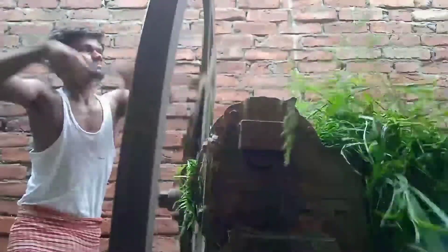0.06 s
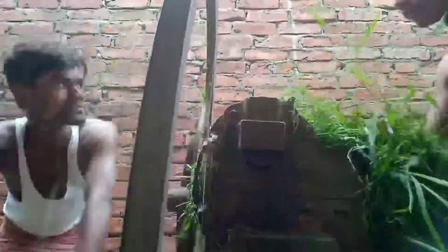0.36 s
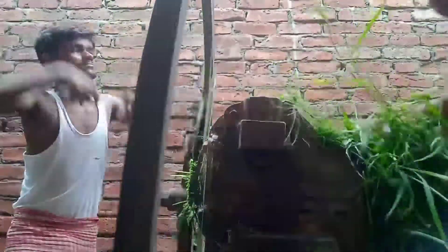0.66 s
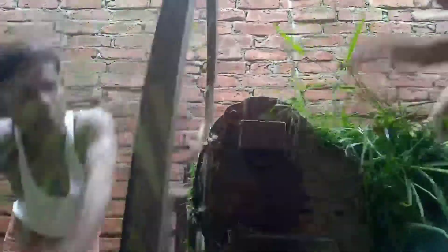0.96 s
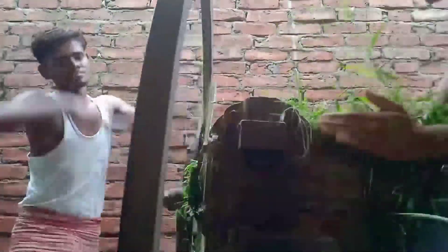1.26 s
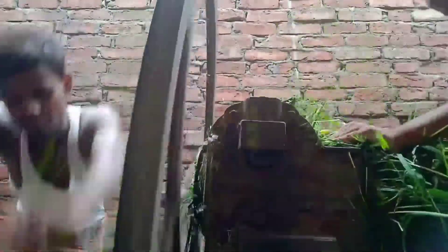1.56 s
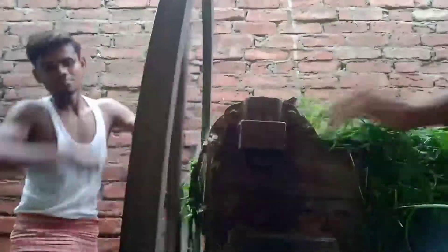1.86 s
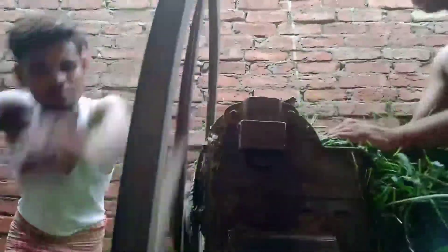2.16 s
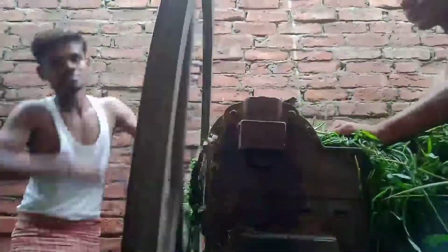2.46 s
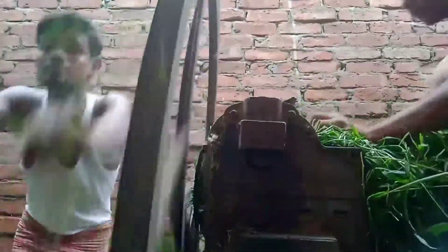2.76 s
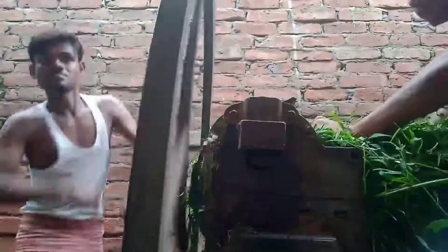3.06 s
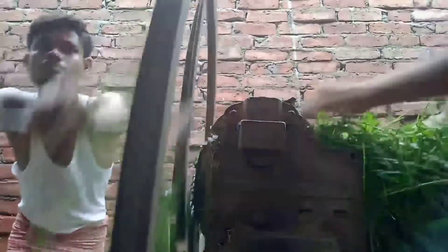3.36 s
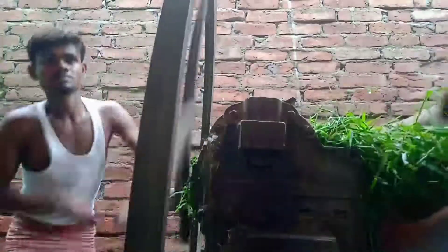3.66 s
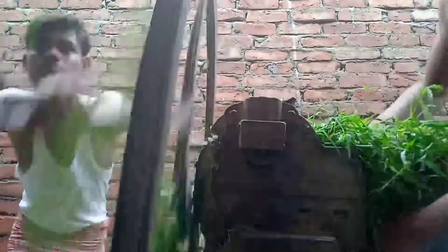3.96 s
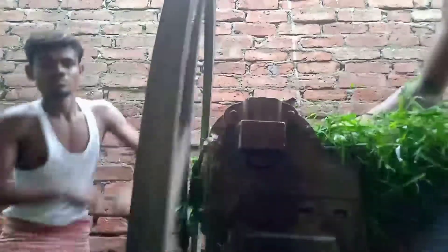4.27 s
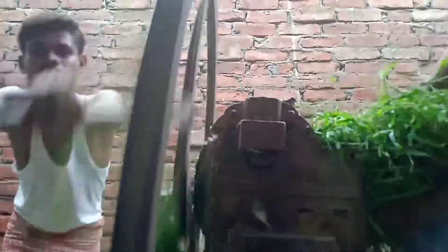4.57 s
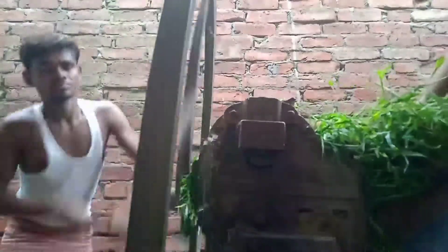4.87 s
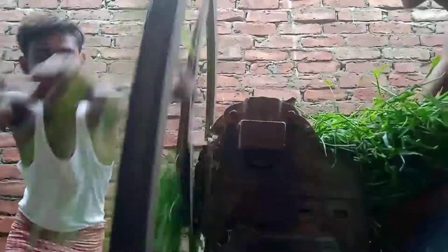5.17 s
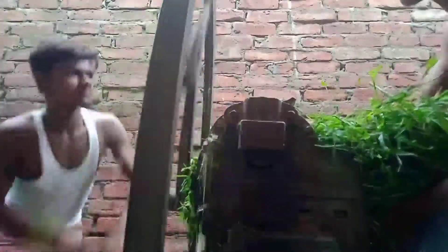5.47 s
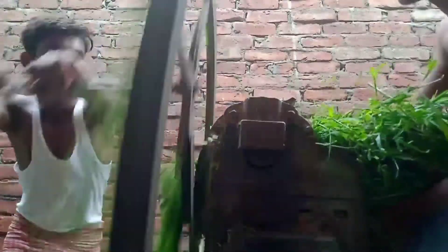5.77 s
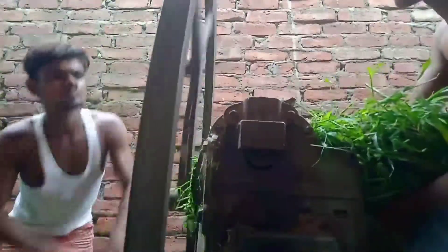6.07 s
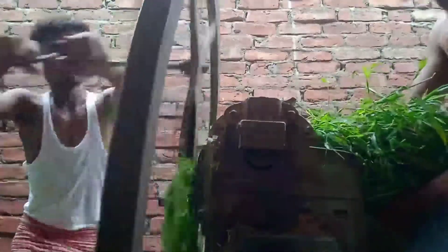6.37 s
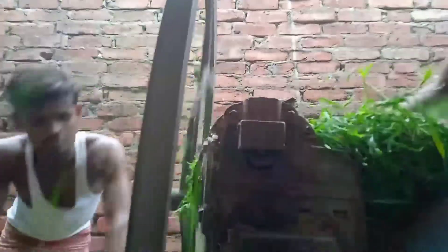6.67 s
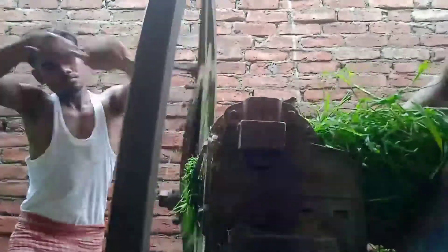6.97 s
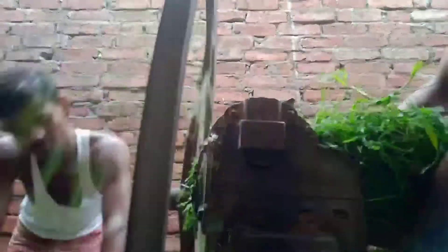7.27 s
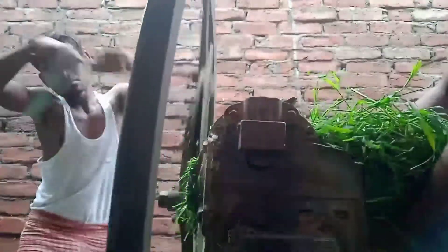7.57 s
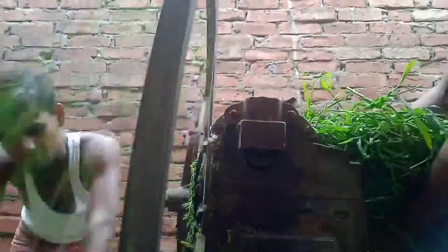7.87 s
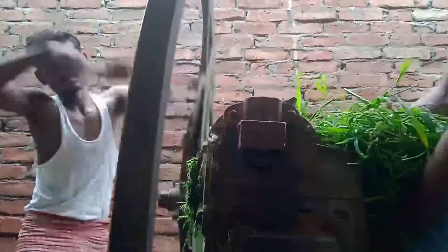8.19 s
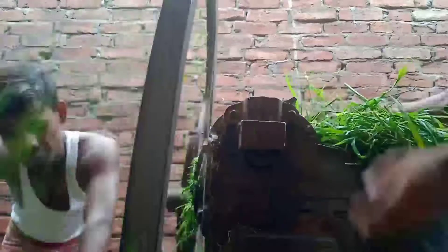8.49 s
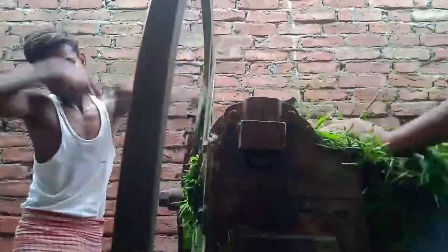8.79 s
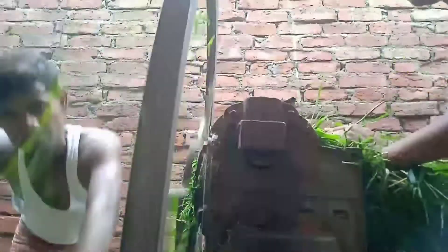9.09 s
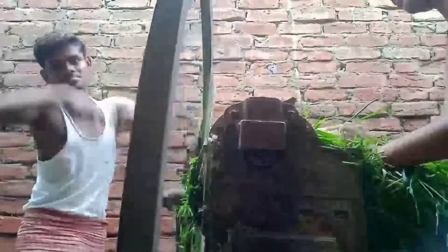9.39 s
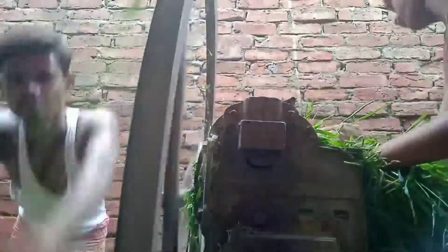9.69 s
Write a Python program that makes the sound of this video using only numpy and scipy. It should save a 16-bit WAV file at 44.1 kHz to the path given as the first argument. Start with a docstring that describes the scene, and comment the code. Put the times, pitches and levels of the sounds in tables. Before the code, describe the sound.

Rhythmic crunching chops of grass and short blade scrapes alternate with the clacking, grinding gears of a hand-turned chaff cutter.

```python
"""A hand-cranked chaff cutter chops green grass in front of a brick wall, with a phone close by.
First a blade crunches through the bundle, snapping stalks and tearing leaves, then scrapes off the
iron mouth. After the cut the loose feed gears knock, grind and sing while more grass rustles in;
now and then chopped clumps drop or a dry bearing chirps. Last, the crank clunks as it takes up its
slack, and the next blade bites. This repeats about every 0.62 s, 16 cuts in all, in a quiet yard."""
import sys
import numpy as np
from scipy import signal
from scipy.fft import rfft, irfft
from scipy.io import wavfile
from scipy.ndimage import uniform_filter1d, minimum_filter1d

SR = 44100
rng = np.random.default_rng(int(sys.argv[2]) if len(sys.argv) > 2 else 0)


def generate_wav(signal):
    """Clip the signal to [-1, 1] and save it as 16-bit WAV at the path in sys.argv[1]."""
    frames = np.transpose(np.atleast_2d(signal))
    scaled = np.clip(frames, -1, 1) * 32767
    pcm = np.round(scaled).astype(np.int16)
    wavfile.write(sys.argv[1], SR, pcm)


N = 438350
T = np.arange(N) / SR

# Table levels are relative: each layer gets its own gain. A "t60" is the time to fade by 60 dB.
# One row per blade pass: (time [s], length [s], stalk crunch [dB], crunch growth during the cut [dB],
# leaf tearing [dB], scrape [dB], grass rustle afterwards [dB], gear singing afterwards [dB])
CUTS = [(0.006, 0.11, -10.5, -1, -18.5, -7.5, -34, -43), (0.637, 0.11, -9, 5, -19, -4.5, -40, -31),
        (1.274, .118, -11.5, 4, -20.5, -7.5, -36, -36), (1.895, 0.11, -11, 2, -19, -8.5, -42, -39),
        (2.516, 0.11, -11, -0.5, -19.5, -12, -38.5, -27), (3.118, 0.13, -13, 0, -20, -10, -37.5, -32),
        (3.732, 0.12, -10.5, 0, -21, -10, -40, -51), (4.343, 0.12, -9.5, -1, -20, -12, -40, -48),
        (4.956, 0.13, -12.5, -4.5, -20.5, -13, -39, -36), (5.590, 0.13, -12, 1, -20.5, -13.5, -36.5, -48),
        (6.249, 0.12, -10.5, 0, -20.5, -9.5, -37.5, -46), (6.873, 0.13, -11.5, -5.5, -21, -34, -37, -49),
        (7.504, .117, -10, -3.5, -19.5, -18, -35, -52), (8.125, 0.12, -9.5, -1, -19.5, -17, -37.5, -49),
        (8.774, 0.1, -10.5, -1.5, -18, -12, -36, -50), (9.408, 0.1, -9, -4.5, -18, -15, -39, -54)]
# The notes at which the cast-iron frame and gears ring: (pitch [Hz], t60 [s], level [dB])
IRON_NOTES = [(611, 0.21, -11), (685, 0.13, 0), (747, 0.11, -3), (823.5, 0.11, 4.5), (957, 0.011, 7.5),
              (979, 0.21, -2.5), (1097, 0.015, 2.5), (1222, 0.093, 6.5), (1261, 0.21, -4),
              (1475, 0.12, 6.5), (1694, 0.019, 6), (1736, 0.21, 2), (1775, 0.18, -1), (1994, 0.082, 5),
              (2295, 0.13, -7), (2660, 0.12, -8), (2700, 0.14, -13), (3250, 0.1, -5.5), (3405, 0.035, -2),
              (3470, 0.021, 0.5), (4370, 0.066, -12.5), (4900, 0.071, -18), (5520, 0.052, -13),
              (5900, 0.047, -13), (6620, 0.043, -8.5)]
# The bright tone of tearing or rustling leaves: (frequency [Hz], level [dB])
LEAF_SPECTRUM = [(100, -20), (280, -5), (700, 5.5), (1600, 8.5), (2600, 7.5), (3100, 2), (4500, -1),
                 (6000, 0.5), (7400, 0), (8500, -7), (11000, -15), (13500, -30.5), (16000, -25)]
# The dull tone of the rattling crank and grinding teeth: (frequency [Hz], level [dB])
RATTLE_SPECTRUM = [(50, -29), (120, -14), (300, -9), (600, -6), (800, 6.5), (1050, -10.5), (1600, -4),
                   (2400, -7.5), (3200, -21), (7000, -26), (10000, -37), (16000, -68)]


def chopping():
    """The blade bites: stalks snap in clusters and shake the iron, while leaves tear in a fine crackle."""
    # The blade hits a tight bundle or a thick stalk: (time [s], level [dB])
    bites = [(1.274, -15.5), (1.889, -11.5), (3.117, -13), (3.234, 0), (4.349, -14), (5.574, -11.5),
             (6.87, -21), (7.498, -11), (8.781, -17)]
    # The tone of snapping stalks: (frequency [Hz], level [dB])
    stalk_spectrum = [(30, -38), (55, -31), (100, -18), (170, -17), (220, -12), (310, -4.5), (420, -3.5),
                      (600, 1), (900, -1), (1250, -6), (1650, -6), (2500, -14), (3200, -25), (8000, -45)]
    start, _, crunch_db, growth_db, leaf_db = np.transpose(CUTS)[:5]
    in_bundle = start + 0.019, cut_ends() - 0.019  # from when to when the blade is fully in the grass
    crunch = swells(*in_bundle, crunch_db, attack_s=0.031, release_s=0.052, growth_db=growth_db)
    tear = swells(*in_bundle, leaf_db, attack_s=0.037, release_s=0.033, growth_db=3)
    times, db = np.transpose(bites)
    bite = bursts(times, db, hold_s=0.0052, rise_s=0.00095, t60=0.034) * clicks(rate=4500, spread_db=1)
    snaps = bite + crunch * clicks(rate=1200, spread_db=2.5) * undb(wander(130))
    pops = hollow_stems(crunch * clicks(rate=200, spread_db=2.5))
    fibres = tear * clicks(rate=7000, spread_db=2) * undb(1.6 * wander(200))
    stalks = undb(-2.5) * colour(snaps, stalk_spectrum)
    return stalks + pops + undb(-17.5) * iron(snaps) + undb(1) * colour(fibres, LEAF_SPECTRUM)


def hollow_stems(pops, pitch_hz=643, width_hz=69):
    """Hollow stems ring briefly as they burst, at a pitch that slides about as they are crushed."""
    # The thickest stems burst with a loud note: (time [s], level [dB])
    thick_stems = [(.035, -3), (0.685, -6), (.715, -9), (2.539, -7), (2.583, -4), (3.151, -8), (3.201, -3),
                   (4.359, -2), (4.385, -5), (4.409, -2), (4.99, -10), (6.91, -7.5), (8.848, -5),
                   (9.45, -2)]
    sliding_hz = pitch_hz * np.exp(0.11 * wander(45))
    tone = np.exp(2j * np.pi * np.cumsum(sliding_hz) / SR)
    decay = np.exp(-np.pi * width_hz / SR)
    # Divide by the tone, smooth, multiply back: each pop now rings at the sliding pitch.
    thin = tone * signal.lfilter([np.sqrt(2 * (1 - decay ** 2))], [1, -decay], pops / tone)
    times, db = np.transpose(thick_stems)
    thick = tone * bursts(times, db, hold_s=0.009, rise_s=0.0031, t60=0.072)
    return (undb(-8) * thin + undb(-4) * thick).imag


def scraping(lead_s=0.04):
    """Just before each cut ends, the blade's edge rubs briefly along the iron mouth."""
    # The tone of the rubbing edge: (frequency [Hz], level [dB])
    edge_spectrum = [(40, -7), (100, -46), (300, -34), (800, 6), (1200, 1), (1650, 7.5), (2200, 3.5),
                     (2780, 3.5), (3050, -9), (4200, -9.5), (7200, -18), (9500, -17.5), (13500, -52),
                     (16000, -21)]
    scrape_db = np.transpose(CUTS)[5]
    pressure = bursts(cut_ends() - lead_s, scrape_db, hold_s=0.023, rise_s=0.024, t60=0.045)
    rub = pressure * clicks(rate=2700, spread_db=-0.5)
    return undb(-0.5) * colour(rub, edge_spectrum) + undb(-3.5) * iron(rub)


def gear_knocks(hold_s=0.013):
    """A loose gear tooth lands and chatters: a dry clack, a clink, a tick and the ring of the frame."""
    # One row per knock: (time [s], level [dB], brightness [dB], ring relative to the level [dB],
    # favoured pitch [Hz])
    knocks = [(0.14, -2.5, -0.5, -18, 1730), (.311, -6, 3, -12, 1050), (.404, -11.5, -3, -13, 1470),
              (.595, -25, 2, -6, 1300), (.788, -12.5, 0.5, -12, 1740), (.959, -6.5, 2.5, -13, 1300),
              (1.23, -18.5, 2.5, -8, 1330), (1.419, -9.5, 2, -11.5, 840), (1.580, -2.5, 1.5, -12, 700),
              (1.701, -10.5, -15, -24, 824), (2.026, -5.5, 5, -9.5, 842), (2.201, -8, -8.5, -25, 1570),
              (2.294, -21, -16, -10, 980), (2.488, -13.5, 2, -15, 1640), (2.649, -7, 4, -8.5, 1740),
              (2.803, -1, 0, -24, 930), (2.89, -11.5, 1, -15.5, 1710), (2.965, -29, -16, -7, 1480),
              (3.263, -9, 2.5, -13, 810), (3.428, -3.5, 3, -15, 787), (3.517, -21.5, -14, -12, 2270),
              (3.879, -3.5, 1.5, -13.5, 860), (4.042, -5.5, -0.5, -17.5, 690), (4.093, -26, 5, -10, 1750),
              (4.490, -6.5, 3, -7, 830), (4.653, -5, 1, -17, 1750), (4.734, -10.5, -1.5, -29, 1900),
              (5.105, 0, 3.5, -8.5, 820), (5.293, -7.5, -1, -16.5, 1530), (5.753, -7.5, 2.5, -12.5, 900),
              (5.946, -11.5, -1, -17, 1770), (6.012, -10, -1.5, -15.5, 920), (6.208, -15, 8, -13, 1490),
              (6.393, -5, 1, -16, 820), (6.57, -8.5, 0, -17, 1310), (6.643, -6.5, -2, -22, 1830),
              (7.024, -10.5, -6, -14, 890), (7.202, -11, -4, -15, 680), (7.278, -15, -22, -14.5, 1200),
              (7.325, -25.5, -16, -10, 830), (7.502, -11.5, 5.5, -5.5, 1220), (7.641, -7.5, -0.5, -19, 890),
              (7.815, -8.5, 1, -15.5, 2010), (7.883, -2, 2, -17, 1830), (8.091, -11, 7, -8.5, 1480),
              (8.275, -11, -3, -18, 842), (8.458, -18, -7, -9, 1240), (8.534, -12.5, 5.5, -8.5, 1740),
              (8.556, -7, -19, -28, 1700), (8.913, -6.5, 2.5, -11.5, 1760), (9.077, -1.5, 2.5, -15, 1690),
              (9.188, -13, -23, -23, 778), (9.244, -12, 0.5, -24, 1750), (9.536, -3, 1.5, -17, 1240),
              (9.703, -5, 3.5, -12, 1200)]
    # The tones of the mid clack, the high clink and the very high tick: (frequency [Hz], level [dB])
    clack_spectrum = [(40, -55), (100, -15), (200, -15), (400, -5), (750, 3), (1400, 0), (2100, 0),
                      (2800, -12), (5000, -19), (9000, -47), (16000, -66)]
    clink_spectrum = [(200, -30), (1500, -9.5), (2300, 10), (2950, -2), (3450, 2), (3900, 4), (4400, 6),
                      (5400, 3), (6200, -4.5), (9000, -26), (16000, -54)]
    tick_spectrum = [(200, -39), (1500, 3), (4000, -14.5), (6000, 5), (7400, 5.5), (8300, -2), (9000, -8.5),
                     (13000, -30), (16000, -34)]
    times, db, bright_db, ring_db, pitch_hz = np.transpose(knocks)
    # Near the end of a cut the gears are still under load, so the clack builds up more slowly.
    loaded = np.abs(times[:, None] - cut_ends()).min(axis=1) < 0.08
    rise_s = np.where(loaded, 0.0075, 0.002)
    clink_db = db + bright_db + np.where(loaded, -19, -14)
    free_tick_db = -27 + 0.7 * (db + 8)  # with no load, a harder knock ticks more sharply
    tick_db = db + bright_db + np.where(loaded, -17.5, free_tick_db)
    chatter = bursts(times, db, hold_s + 0.52 * rise_s, rise_s, t60=0.13) * clicks(rate=5000, spread_db=2)
    clink = bursts(times, clink_db, hold_s, rise_s=0.0016, t60=0.1) * clicks(rate=6700, spread_db=2.5)
    tick = bursts(times, tick_db, hold_s, rise_s=0.0044, t60=0.071) * clicks(rate=9000, spread_db=2)
    ringing = np.zeros(N + SR)
    for start, level_db, hz, build_s in zip((times * SR).astype(int), db + ring_db, pitch_hz, rise_s):
        tone = undb(level_db) * frame_ring(hz, build_s)
        ringing[start:start + len(tone)] += tone
    contact = undb(-12.5) * colour(chatter, clack_spectrum)
    contact += colour(undb(-6.5) * clink + undb(-6) * iron(clink), clink_spectrum)
    contact += undb(-4) * colour(tick, tick_spectrum)
    return contact + undb(-18.5) * iron(chatter) + undb(11.5) * ringing[:N]


def frame_ring(pitch_hz, build_s, favour_db=5, scatter_db=3):
    """After one knock the iron's notes build up and fade; the spot struck favours one pitch."""
    t = T[:SR // 3]
    hz, t60, db = np.transpose(IRON_NOTES)[:, :, None]
    strength, detune, phase = rng.standard_normal((len(IRON_NOTES), 3)).T[:, :, None]
    nearness = np.exp(-(np.log(hz / pitch_hz) / 0.1) ** 2)
    gain = undb(db + scatter_db * strength + favour_db * nearness)
    notes = undb(-60 * t / t60) * np.sin(2 * np.pi * (hz * (1 + 0.006 * detune) * t + phase))
    build_up = 1 - np.exp(-t / build_s)
    return build_up * np.sum(gain * notes, axis=0) / np.linalg.norm(gain)


def iron(force):
    """Every small push on the machine sets all of its iron notes ringing."""
    t = T[:SR // 2]
    response = np.zeros(len(t))
    for k, (hz, t60, db) in enumerate(IRON_NOTES):
        fade = undb(db - 60 * t / t60) / np.sqrt(t60)
        response += (-1) ** k * fade * np.sin(2 * np.pi * hz * t)
    return signal.fftconvolve(force, response / np.linalg.norm(response))[:N]


def crank(note_hz=785, width_hz=45):
    """The handle shifts in its seat with a dull rattle and a short hollow note."""
    # The crank takes up its slack before a cut: (time [s], level [dB])
    clunks = [(0.562, -11.5), (1.199, -7.5), (1.822, -6.5), (2.439, -7), (3.047, -5.5), (3.666, -10.5),
              (4.281, -7), (4.306, -3.5), (4.89, -9), (5.522, -11), (6.177, -9), (6.802, -9), (7.433, -8.5),
              (8.058, -9), (8.694, -9.5), (9.329, -10.5), (9.363, -9)]
    times, db = np.transpose(clunks)
    rattle = bursts(times, db, hold_s=0.0099, rise_s=0.0039, t60=0.14) * clicks(rate=1800, spread_db=1.5)
    return undb(-19) * colour(rattle, RATTLE_SPECTRUM) + undb(-5) * resonate(rattle, note_hz, width_hz)


def falling_chaff():
    """Wet clumps of chopped grass land with soft pats."""
    # A clump lands: (time [s], level [dB])
    drops = [(0.227, -17), (1.092, -28), (1.478, -23), (1.578, -8), (2.313, -26), (2.989, -45),
             (5.442, -30), (7.323, -20), (8.254, -14), (8.418, -26), (9.642, -25.5)]
    # The tone of a soft pat: (frequency [Hz], level [dB])
    pat_spectrum = [(30, -30), (60, -18), (130, -9), (300, -2), (650, 0), (1100, -5), (2500, -16),
                    (7000, -28), (16000, -50)]
    times, db = np.transpose(drops)
    pats = bursts(times, db, hold_s=0.0034, rise_s=0.0033, t60=0.074) * clicks(rate=2000, spread_db=1.5)
    return undb(-2) * colour(pats, pat_spectrum)


def dry_bearing(width_hz=200):
    """A dry bearing sticks and slips in short bursts, making rough chirps."""
    # One row per chirp: (time [s], level [dB], pitch [Hz])
    chirps = [(1.230, -18.5, 1360), (1.258, -39, 1650), (2.311, -23, 950), (7.5, -19, 3420),
              (8.090, -17, 1430), (9.178, -13, 907), (9.177, -28, 2180)]
    out = np.zeros(N)
    for time, db, hz in chirps:
        slips = resonate(rng.standard_normal(N), hz, width_hz)
        slips = resonate(slips, hz, width_hz)  # a second pass makes the pitch clearer
        out += bursts([time], [db], hold_s=0.011, rise_s=0.007, t60=0.079) * slips / np.std(slips)
    return undb(1) * out


def gear_singing(note_hz=1742, width_hz=18, delay_s=0.028, hold_s=0.044):
    """After each cut the rubbing teeth keep one clear note of the large gear going."""
    tone = resonate(clicks(rate=200, spread_db=3), note_hz, width_hz)
    start = cut_ends() + delay_s
    singing_db = np.transpose(CUTS)[7]
    loudness = swells(start, start + hold_s, singing_db, attack_s=0.04, release_s=0.51)
    return undb(-9) * loudness * tone / np.std(tone)


def gear_grinding(hold_s=0.017, idle_db=-42.5):
    """Dry teeth slide on each other all the time and keep the iron ringing."""
    # The teeth slide hardest once after each cut: (time [s], level [dB])
    grinds = [(.385, -27), (1.06, -26.5), (1.65, -23), (2.27, -28), (2.95, -26.5), (3.55, -32),
              (4.13, -30.5), (4.80, -30), (5.37, -34), (6.08, -35), (6.71, -41), (7.34, -28), (7.97, -25),
              (8.61, -30), (9.16, -27), (9.82, -26)]
    times, db = np.transpose(grinds)
    hard_slide = swells(times - hold_s / 2, times + hold_s / 2, db, attack_s=0.14, release_s=0.11)
    slide = np.hypot(hard_slide, undb(idle_db))
    grit = slide * undb(wander(30)) * clicks(rate=580, spread_db=6)
    return undb(-9) * iron(grit) + undb(-7.5) * colour(grit, RATTLE_SPECTRUM)


def feed_rollers():
    """After each cut the rollers drag rustling grass in."""
    rustle_db = np.transpose(CUTS)[6]
    pull = swells(cut_ends() + 0.12, cut_ends() + 0.073, rustle_db, attack_s=0.083, release_s=0.99)
    rustle = pull * undb(2 * wander(22)) * clicks(rate=1700, spread_db=1)
    return undb(-5.5) * colour(rustle, LEAF_SPECTRUM)


def wall_echoes(x, near_db=-13, near_t60=0.011, far_db=-22.5, far_t60=0.32, far_cutoff_hz=2810):
    """Sound bounces quickly off the brick and the ground, then leaves a weak, duller tail."""
    t = T[:SR // 2]
    near = rng.standard_normal(len(t)) * (t > 0.002) * undb(-60 * t / near_t60)
    far = rng.standard_normal(len(t)) * (t > 0.002) * undb(-60 * t / far_t60)
    far = signal.sosfilt(signal.butter(1, far_cutoff_hz, fs=SR, output="sos"), far)
    response = undb(near_db) * near / np.linalg.norm(near) + undb(far_db) * far / np.linalg.norm(far)
    return x + signal.fftconvolve(x, response)[:N]


def yard():
    """A faint, nearly steady outdoor background."""
    # A low rumble with a little hiss: (frequency [Hz], level [dB])
    yard_spectrum = [(20, -31), (50, -8), (100, 2), (200, -7.5), (400, 1), (800, -8), (2000, -42),
                     (4000, -53), (7000, -23), (12000, -37.5), (16000, -37)]
    return undb(-45 + wander(2.8)) * colour(rng.standard_normal(N), yard_spectrum)


def cut_ends():
    """The times at which the blade is through the bundle."""
    start, length = np.transpose(CUTS)[:2]
    return start + length


def undb(db):
    """Turn decibels into a factor to multiply by."""
    return 10 ** (np.asarray(db) / 20)


def clicks(rate, spread_db):
    """Random clicks of uneven size, about `rate` a second, scaled to an average power of 1."""
    size = undb(spread_db * np.clip(rng.standard_normal(N), -2, 2))
    x = (rng.random(N) < rate / SR) * rng.choice([-1, 1], N) * size
    return x / np.std(x)


def wander(rate):
    """A random drift, mostly between -1 and 1, that heads for a new value `rate` times a second."""
    return np.interp(T * rate, np.arange(4096), rng.standard_normal(4096))


def bursts(times, levels_db, hold_s, rise_s, t60):
    """Loudness curve of brief contacts: each rises, and starts to fade hold_s after it began."""
    power = np.zeros(N)
    for time, db, hold, rise in zip(*np.broadcast_arrays(times, levels_db, hold_s, rise_s)):
        start = max(int(time * SR), 0)
        t = T[:min(SR // 2, N - start)]
        fade = undb(db - 60 * np.maximum(t - hold, 0) / t60)
        power[start:start + len(t)] += (np.minimum(t / rise, 1) * fade) ** 2
    return np.sqrt(power)


def swells(starts, ends, levels_db, attack_s, release_s, growth_db=0):
    """Loudness curve of pushes: up 20 dB per attack_s until the start, down 20 per release_s after the end."""
    power = np.zeros(N)
    for start, end, db, growth in zip(*np.broadcast_arrays(starts, ends, levels_db, growth_db)):
        drop_db = 20 * (np.maximum(start - T, 0) / attack_s + np.maximum(T - end, 0) / release_s)
        audible = drop_db < 80
        progress = np.interp(T[audible], [start, end], [-0.5, 0.5])
        power[audible] += undb(db + growth * progress - drop_db[audible]) ** 2
    return np.sqrt(power)


def resonate(x, pitch_hz, width_hz):
    """Keep a band around one pitch; the narrower it is, the longer it rings."""
    return signal.lfilter(*signal.iirpeak(pitch_hz, pitch_hz / width_hz, fs=SR), x)


def colour(x, spectrum, size=4096):
    """Give a sound the tone of a spectrum table; white noise keeps its power."""
    hz, db = np.transpose(spectrum)
    grid_hz = np.maximum(np.fft.rfftfreq(size, 1 / SR), 1)
    gain = undb(np.interp(np.log(grid_hz), np.log(hz), db))
    # Build the filter so that it rings only after a click, never before it.
    cepstrum = irfft(np.log(gain))
    cepstrum[1:size // 2] *= 2
    cepstrum[size // 2 + 1:] = 0
    response = irfft(np.exp(rfft(cepstrum)))
    return signal.fftconvolve(x, response / np.linalg.norm(response))[:N]


def scene():
    """The machine and its echoes over the quiet yard, in one channel."""
    machine = chopping() + scraping() + gear_knocks() + dry_bearing() + gear_singing()
    machine += crank() + falling_chaff() + gear_grinding() + feed_rollers()
    return (wall_echoes(machine) + yard())[None]


def record(dry, port_hz=15200, port_db=12, bass_cut_hz=70, ceiling=0.74, top_hz=15700):
    """The microphone's opening rings very high; the phone cuts the bass, limits peaks and cuts the top."""
    port_ring = undb(port_db) * resonate(dry, port_hz, port_hz / 14)
    x = signal.sosfilt(signal.butter(1, bass_cut_hz, "high", fs=SR, output="sos"), dry + port_ring)
    # A fast limiter turns the gain down just ahead of each peak.
    gain = minimum_filter1d(ceiling / np.maximum(np.abs(x), ceiling), size=40)
    x = x * uniform_filter1d(gain, size=40)
    return signal.sosfilt(signal.ellip(10, 0.2, 80, top_hz, fs=SR, output="sos"), x)


dry = scene()
out = record(dry)
generate_wav(out)
```